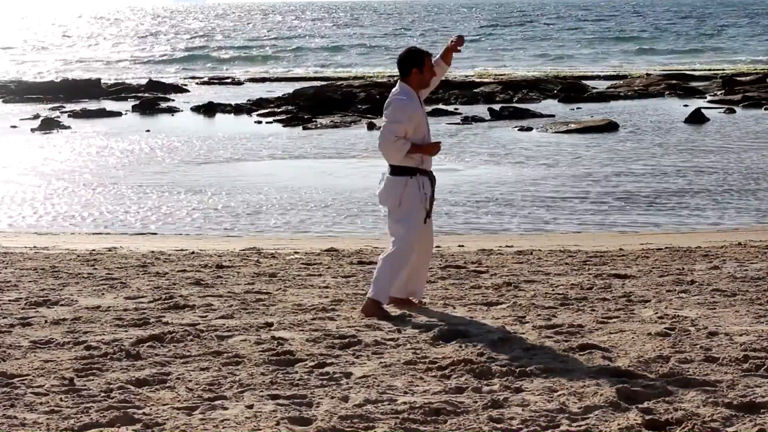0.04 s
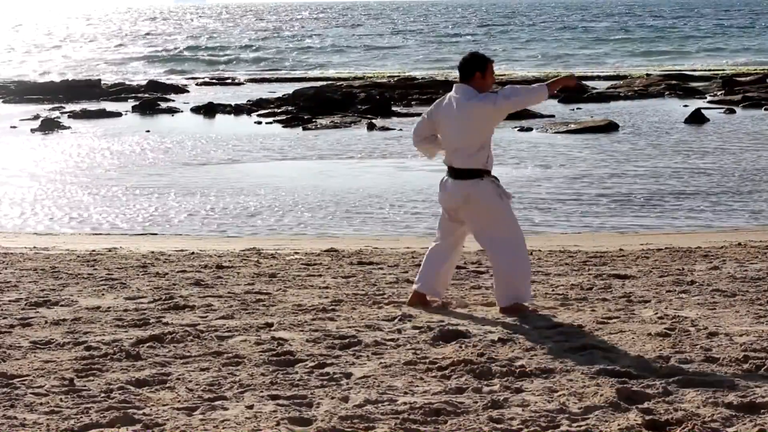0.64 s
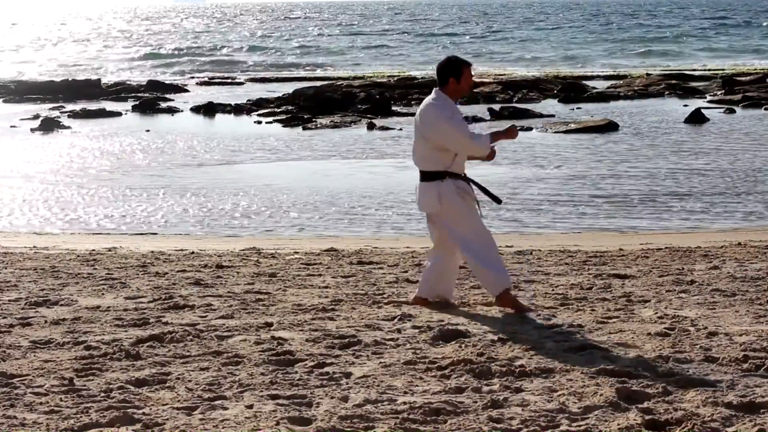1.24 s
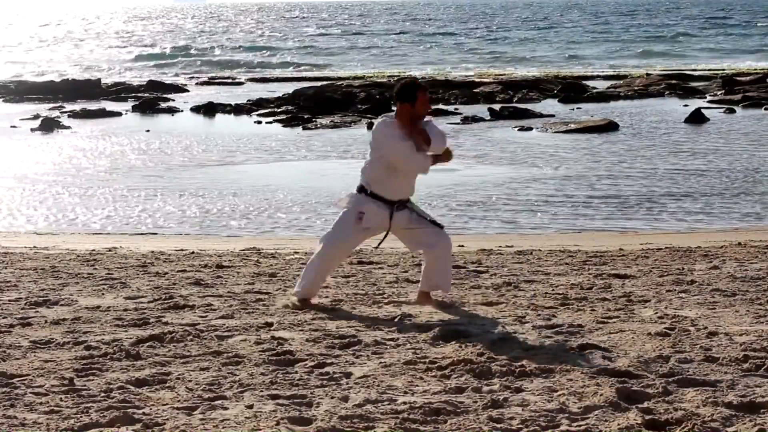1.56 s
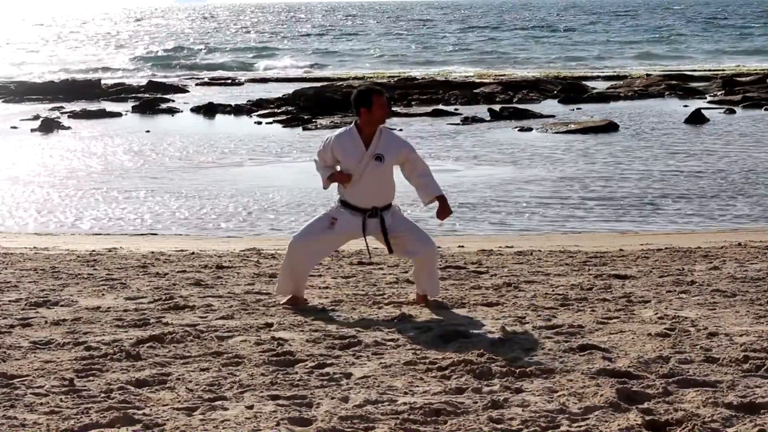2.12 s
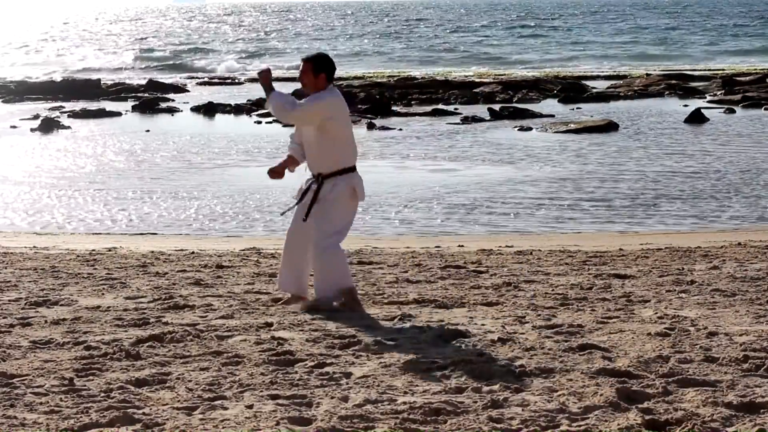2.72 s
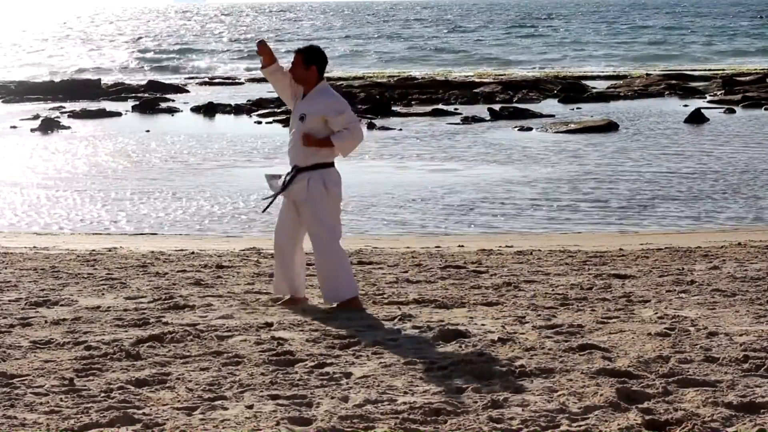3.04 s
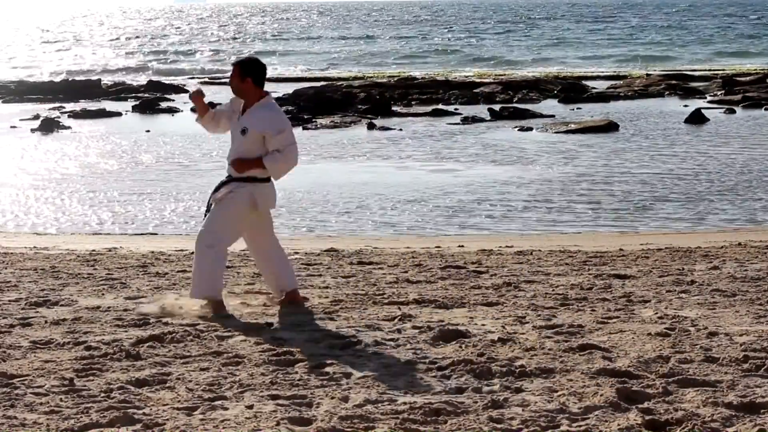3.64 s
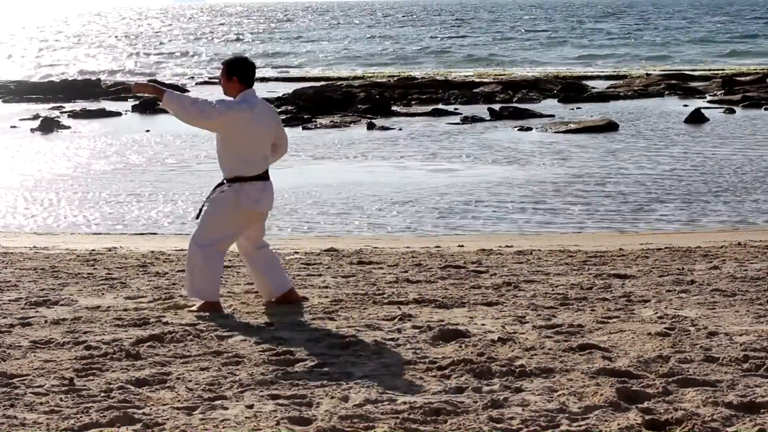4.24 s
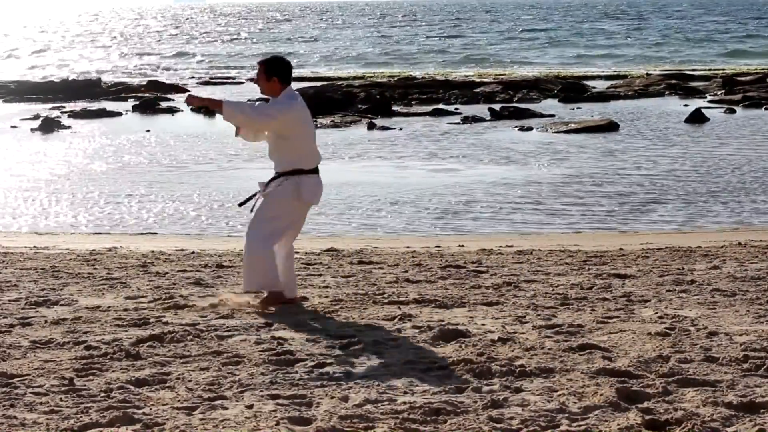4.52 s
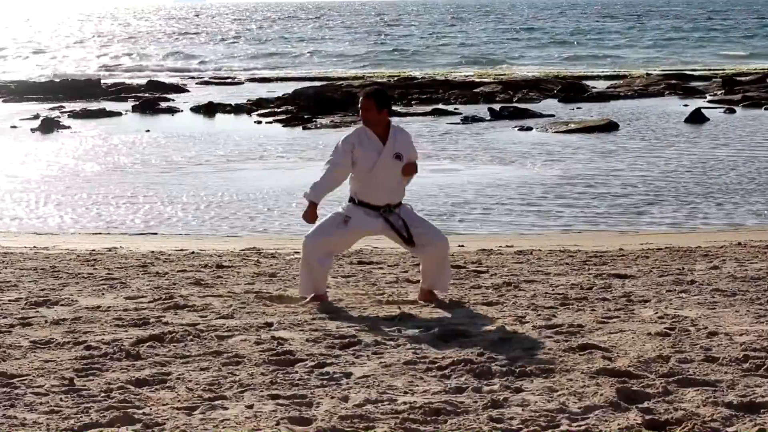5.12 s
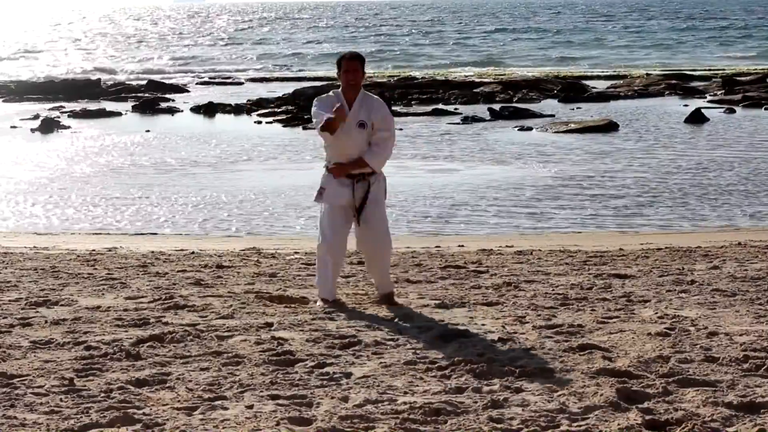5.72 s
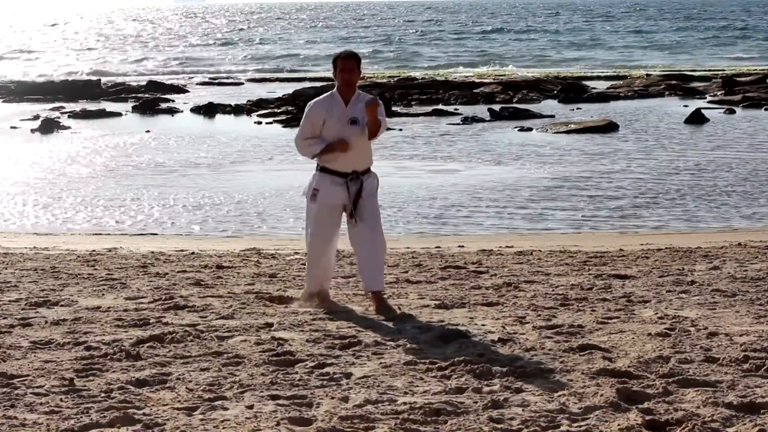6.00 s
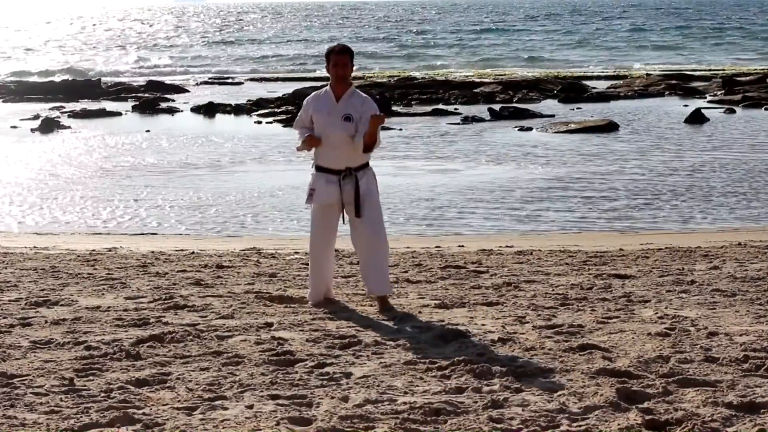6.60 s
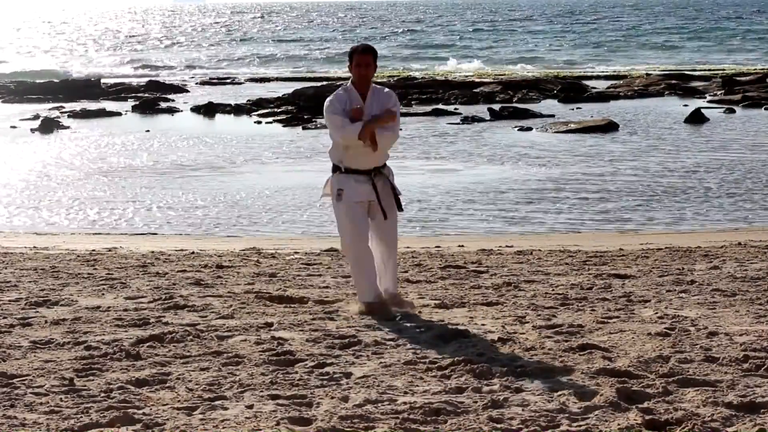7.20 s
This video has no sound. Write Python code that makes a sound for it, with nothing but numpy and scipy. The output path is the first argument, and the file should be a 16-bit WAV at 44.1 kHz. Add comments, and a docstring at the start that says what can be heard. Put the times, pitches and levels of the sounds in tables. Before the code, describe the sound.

Wind rumbles on the microphone over steady surf, with a few swishes and snaps of a cotton karate uniform.

```python
"""A karate form on a windy beach, heard by one camera microphone.
From the start, wind buffets the microphone over the wash of surf on a reef. Near 0.6 s a bare foot
scuffs the sand and the heavy cotton uniform swishes, then snaps taut. Techniques follow about once
a second, the sharpest at 2.9 s; after it the surf's hiss drops about 5 dB, then comes back.
The last snap, at 5 s, is a dull one. After it only faint scuffs remain under the wind and the sea."""
import sys
import numpy as np
from scipy import signal
from scipy.fft import rfft, irfft
from scipy.io import wavfile

SR = 44100
rng = np.random.default_rng(int(sys.argv[2]) if len(sys.argv) > 2 else 0)


def wrap_up_sound(samples):
    """Save the sound to the file named by the first command line argument, as 16-bit audio."""
    columns = np.atleast_2d(samples).T
    # keep every value between -1 and 1, then stretch to whole-number steps
    tamed = np.clip(columns, -1, 1)
    steps = np.round(tamed * 32767).astype(np.int16)
    wavfile.write(sys.argv[1], SR, steps)


N = 328986
TIME = np.arange(N) / SR
HZ = np.fft.rfftfreq(N, 1 / SR)

# tone of heavy cotton, for swishes and snaps alike: f/Hz, level/dB
CLOTH_COLOUR = [(150, -6), (500, 16), (1000, 8), (1800, 1), (3600, -4), (5000, -16.5), (8000, -21),
                (15000, -34)]


def uniform():
    """Cotton rubs in a fine rustle, then cracks in bursts of a few milliseconds."""
    # a sleeve or trouser leg sweeps through the air: t/s at the fastest, level/dB, half length/s
    swishes = [(.55, -33.5, 0.051), (.626, -32, 0.0099), (1.703, -31, 0.028), (2.885, -39, 0.009),
               (2.921, -33, 0.021), (5.06, -38.5, .015)]
    # the cloth cracks taut: t/s, level/dB, decay/s, centre f/Hz, width/octaves
    snaps = [(.6345, -30, .005, 3600, 2.2), (.7095, -32, .002, 2800, 2), (.7232, -36.5, .002, 9000, 1.4),
             (.7265, -29.5, .004, 3600, 1.7), (1.7398, -35, .0006, 10500, .33),
             (2.872, -19, .0014, 3200, 3), (2.8838, -18, .0011, 2500, .85), (2.9, -36, .001, 11000, 1.2),
             (2.9064, -27.5, .002, 4000, 1.7), (3.986, -30.5, .005, 3300, 1.8), (5.055, -27, .013, 950, .5)]
    cloth = strokes(swishes) * coloured(grains(per_s=9000, spread_db=0.5), CLOTH_COLOUR)
    for s, db, decay_s, centre_hz, octaves in snaps:
        burst = snap(decay_s, centre_hz, octaves)
        start = round(s * SR) - len(burst) // 2
        cloth[start:start + len(burst)] += gain_of(db) * burst
    return cloth


def snap(decay_s, centre_hz, octaves, kick=0.45, length=2048):
    """One kick of air as a fold goes taut, then a dying shiver."""
    t, hz = np.arange(length) / SR, np.fft.rfftfreq(length, 1 / SR)
    drive = rng.standard_normal(length) * np.exp(-t / decay_s)
    drive[0] = kick * np.linalg.norm(drive)
    drive *= np.sqrt(decay_s * SR) / np.linalg.norm(drive)  # rms about one over the decay time
    fold = np.exp(-.5 * (np.log2((hz + 1) / centre_hz) / octaves) ** 2)  # small folds high, large low
    crack = irfft(rfft(drive) * evened(fold * response(CLOTH_COLOUR, hz)))
    return np.roll(crack, length // 2)  # the kick sits in the middle


def sand():
    """Dry grains spray from under a sliding foot."""
    # foot slides: t/s at the fastest, level/dB, half length/s
    scuffs = [(.56, -56, 0.048), (.655, -53, .018), (2.57, -51, .08), (2.92, -50, 0.029), (5.07, -44, .02),
              (5.98, -60, .1), (7.0, -54, .08), (7.255, -53, .018)]
    # bright grit of dry sand: f/Hz, level/dB
    sand_colour = [(800, -18), (3600, 10), (5000, -1), (8000, -9.5), (12000, -13), (14000, -14),
                   (15500, -25)]
    return strokes(scuffs) * coloured(grains(per_s=5300, spread_db=2.5), sand_colour)


def wind(buffet_db=0.09, rasp_db=-0.5, lumpy_db=1, gusty_db=0.44, lean_db=0.29):
    """Large eddies push on the microphone; smaller ones flutter and rasp over it in lumps."""
    # the wind's strength before gusts and trims: t/s, buffet level/dB, flutter level/dB, rasp level/dB
    strength = [(0.0, -11.5, -19.5, -25), (0.42, -20, -19.5, -32.0), (0.61, -14.5, -18, -27.0),
                (1.38, -15, -19.5, -29.5), (1.53, -18, -17.5, -28.5), (1.87, -13.5, -19.0, -31),
                (2.33, -14.5, -20.0, -28.5), (2.48, -19.5, -15.5, -27), (2.75, -15, -20.0, -27),
                (4.39, -15, -18, -28.5), (4.54, -17.5, -25.5, -31.5), (4.86, -14.5, -19.5, -26.5),
                (5.01, -13.0, -20.5, -29.5), (5.58, -17.5, -18.5, -24.5), (6.46, -14.5, -19, -30.5),
                (6.69, -16, -21.5, -33.5), (7.07, -14.5, -15.5, -25.5), (7.45, -18.5, -21, -34.5)]
    # deep rumble of the large eddies: f/Hz, level/dB
    buffet_colour = [(12, -34), (25, -24), (33, -12), (41, -6), (50, 0.5), (68, .5), (100, 1.5),
                     (125, -5.5), (170, -15.5), (300, -48.5), (600, -86.5)]
    # low flutter of the smaller eddies: f/Hz, level/dB
    flutter_colour = [(70, -28.5), (120, -2.5), (155, 0), (200, -2.5), (240, -6.5), (290, -11.5),
                      (380, -33.5), (1000, -80)]
    # low-mid rasp of the smallest eddies: f/Hz, level/dB
    rasp_colour = [(200, -21), (300, 0), (370, -3.5), (450, -10.5), (600, -20), (1500, -66.5)]
    # brief gusts and lulls: t/s, level change/dB
    gusts = [(.63, 0.5), (1.05, -2.5), (1.93, 0.5), (2.08, -4.5), (3.61, -3), (3.87, 1.5), (4.72, -0.5),
             (6.0, -3), (6.29, 2.5)]
    lumps = gain_of(lumpy_db * drift(rate_hz=45))
    buffet = steadied(noise(buffet_colour), span_s=0.24) * level(strength, column=1)
    flutter = steadied(noise(flutter_colour) * lumps, span_s=0.3) * level(strength, column=2)
    rasp = steadied(noise(rasp_colour) * lumps, span_s=0.25) * level(strength, column=3)
    gust_db = sum(db * bell(s, half_s=0.043) for s, db in gusts)
    gusting = gain_of(gusty_db * drift(rate_hz=7) + gust_db)
    pan_db = lean_db * np.array([[1], [-1]])  # a little harder on the left
    lows = gain_of(buffet_db + pan_db) * buffet + gain_of(pan_db / 2) * flutter
    return gusting * (lows + gain_of(rasp_db) * rasp)


def surf(roar_db=3.0, wash_db=1, churn_db=0.95, froth_db=0.73, lap_db=0.57, splash_db=-11):
    """Breakers roar on the reef; their foam hisses, full of small splashes. Both share one envelope."""
    # the surf's hiss drops about 5 dB after 2.9 s, then comes back: t/s, relative level/dB
    fader = [(0.0, -39), (.55, -38.5), (1.98, -39), (2.8, -38), (3.32, -44), (3.86, -41.5), (4.45, -43),
             (4.68, -39.5), (5.65, -38), (6.15, -36.5), (6.45, -38), (6.85, -38), (7.0, -36.5), (7.45, -40)]
    # midrange body of the breakers: f/Hz, level/dB
    roar_colour = [(200, -25.5), (450, 2), (700, 2), (950, -2), (1300, -10), (2200, -17), (5000, -58.5)]
    # broad hiss of the foam: f/Hz, level/dB
    wash_colour = [(300, -20), (800, 1), (1300, 1.5), (2000, -3.5), (2600, -5.5), (3100, -5.5),
                   (3600, -4.5), (4200, -11.5), (5000, -15.5), (6000, -20.5), (7500, -24), (9000, -29.5),
                   (12000, -35), (15500, -46)]
    roar = noise(roar_colour) * gain_of(churn_db * drift(rate_hz=26))
    foam = rng.standard_normal(N) + gain_of(splash_db) * grains(per_s=1500, spread_db=4.0)
    wash = coloured(foam, wash_colour) * gain_of(froth_db * drift(rate_hz=15))
    lapping = gain_of(lap_db * drift(rate_hz=5))  # small waves ripple the level
    envelope = level(fader, column=1) * lapping
    return envelope * (gain_of(roar_db) * roar + gain_of(wash_db) * wash)


def gain_of(db):
    """Decibels to a factor."""
    return 10 ** (np.asarray(db) / 20)


def evened(x):
    """Scales to an rms of one."""
    return x / np.sqrt(np.mean(x ** 2) + 1e-20)


def response(colour, hz):
    """Reads an EQ curve drawn on a log-frequency axis as gains."""
    points_hz, db = np.transpose(colour)
    return gain_of(np.interp(np.log(hz + 1), np.log(points_hz), db))


def coloured(x, colour):
    """Filters by an EQ curve; rms one."""
    return evened(irfft(rfft(x) * response(colour, HZ), N))


def noise(colour):
    """A noise bed shaped by an EQ curve; rms one."""
    return coloured(rng.standard_normal(N), colour)


def level(curve, column):
    """One dB column of a fader curve as a gain for every sample."""
    rows = np.asarray(curve)
    return gain_of(np.interp(TIME, rows[:, 0], rows[:, column]))


def drift(rate_hz):
    """A random wobble of rms one, up to about rate_hz swings a second."""
    return evened(irfft(rfft(rng.standard_normal(N)) / (1 + (HZ / rate_hz) ** 4), N))


def steadied(x, span_s):
    """Rides the slow swings out of a noise, so that an envelope can set its strength."""
    window = signal.windows.hann(int(span_s * SR) | 1)
    power = signal.fftconvolve(x ** 2, window / window.sum(), "same")
    return x / np.sqrt(power + 1e-9)


def grains(per_s, spread_db):
    """A random train of tiny clicks; a wide spread makes a few stand out."""
    size = gain_of(spread_db * np.minimum(rng.exponential(1, N), 4))
    return evened(size * rng.standard_normal(N) * (rng.random(N) < per_s / SR))


def bell(s, half_s):
    """A smooth rise and fall of height one around a moment."""
    return np.exp(-.5 * ((TIME - s) / half_s) ** 2)


def strokes(moves):
    """The summed bell-shaped envelopes of some quick movements."""
    return sum(gain_of(db) * bell(s, half_s) for s, db, half_s in moves)


def scene():
    """The sea and the performer are straight ahead, under the wind."""
    return wind() + surf() + uniform() + sand()


def record(dry, ceiling=1.0, fade_s=.004, cutoff_hz=15600):
    """Soft-clips the largest gusts, fades both ends and cuts the highest treble."""
    rounded = dry / (1 + (dry / ceiling) ** 6) ** (1 / 6)
    faded = rounded * signal.windows.tukey(N, 2 * fade_s * SR / N)
    lowpass = signal.firwin(511, cutoff_hz, window=("kaiser", 9), fs=SR)
    return signal.oaconvolve(faded, lowpass[None], "same")


dry = scene()
out = record(dry)
wrap_up_sound(out)
```